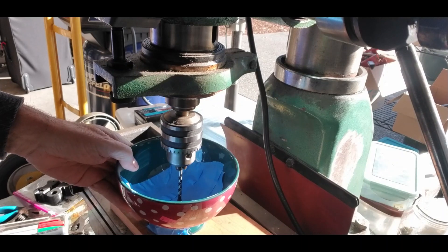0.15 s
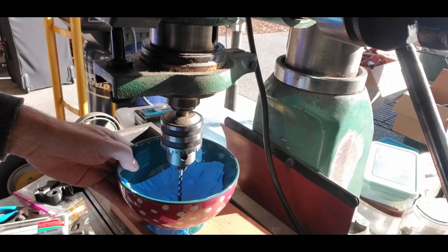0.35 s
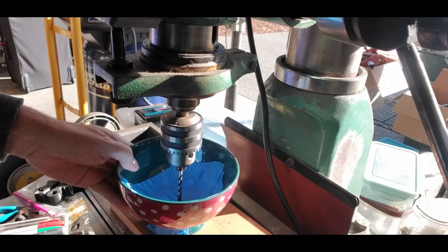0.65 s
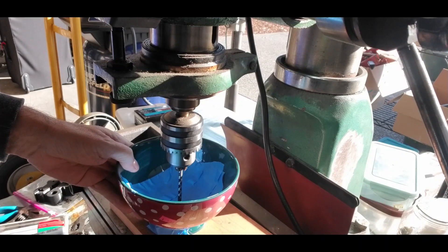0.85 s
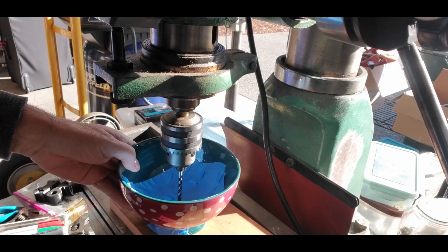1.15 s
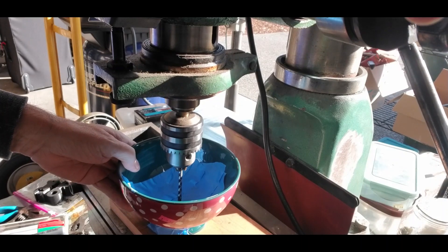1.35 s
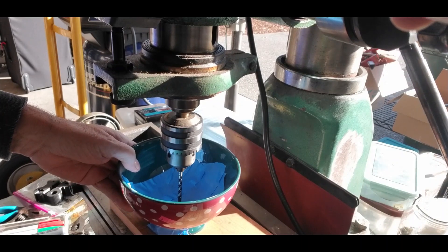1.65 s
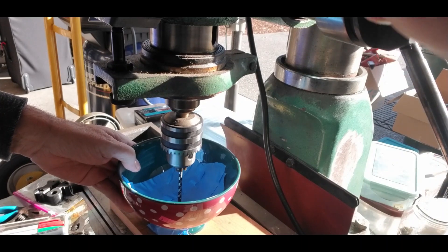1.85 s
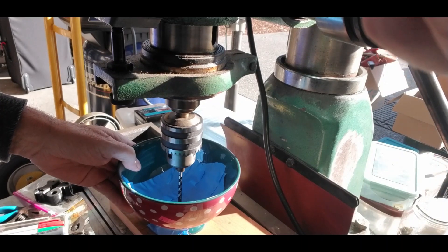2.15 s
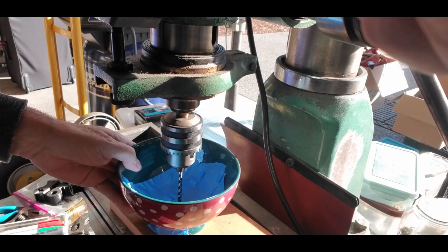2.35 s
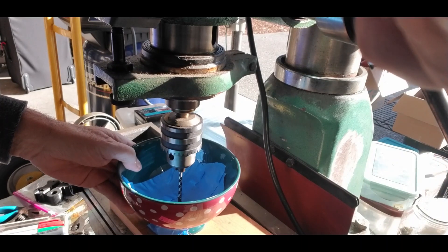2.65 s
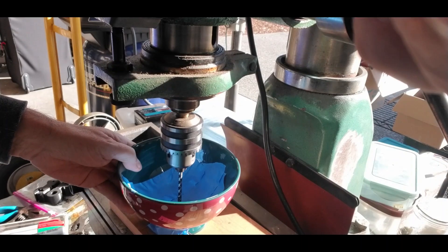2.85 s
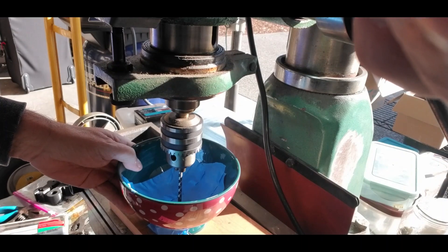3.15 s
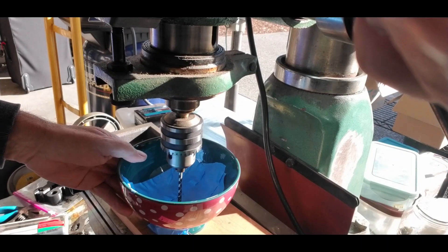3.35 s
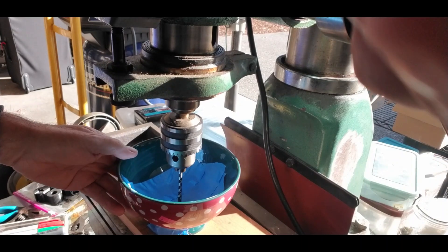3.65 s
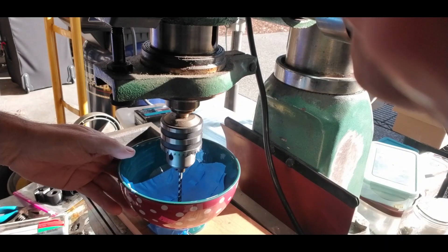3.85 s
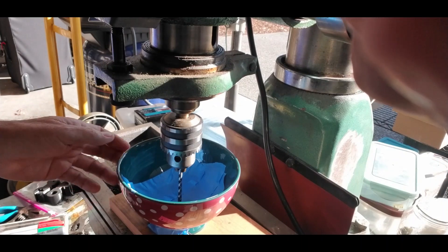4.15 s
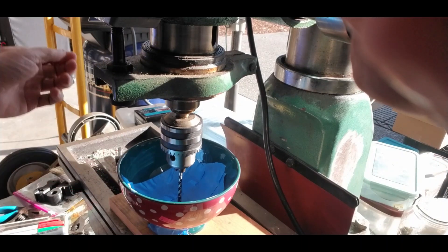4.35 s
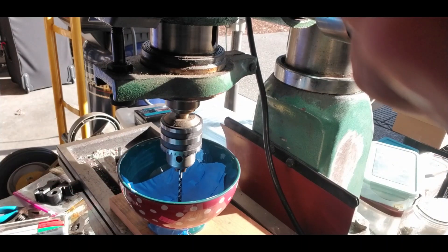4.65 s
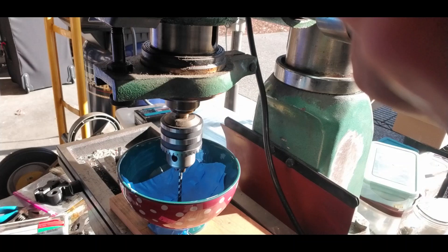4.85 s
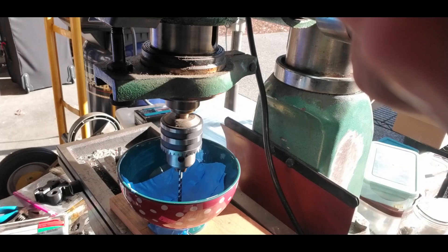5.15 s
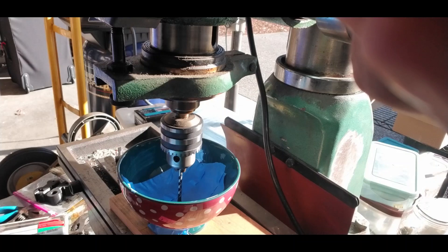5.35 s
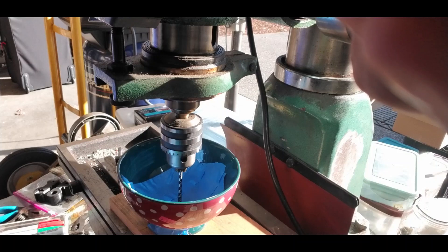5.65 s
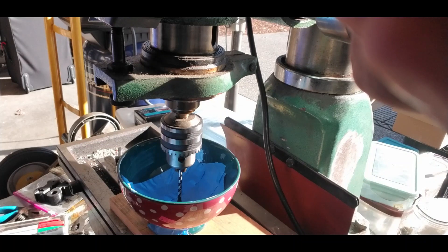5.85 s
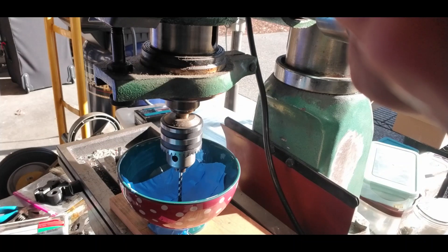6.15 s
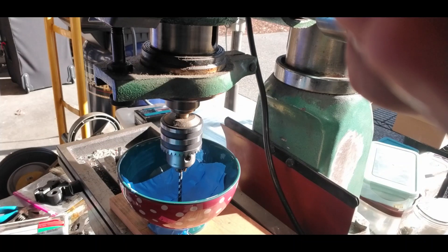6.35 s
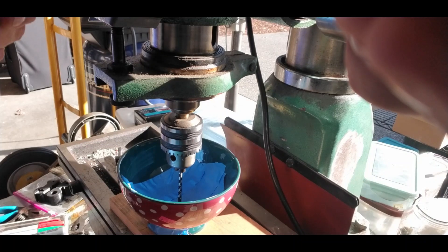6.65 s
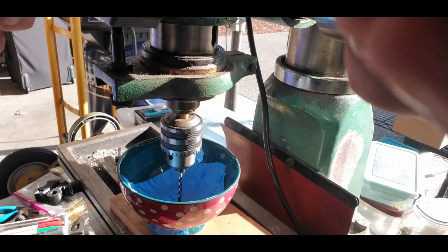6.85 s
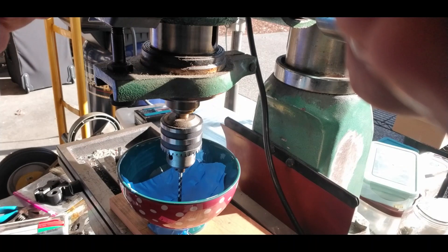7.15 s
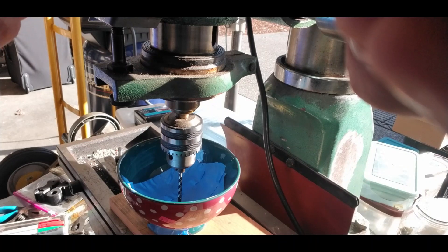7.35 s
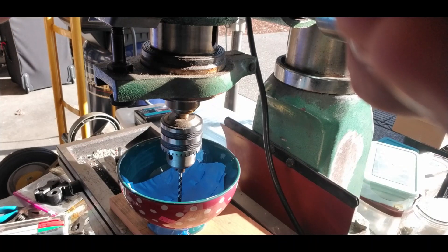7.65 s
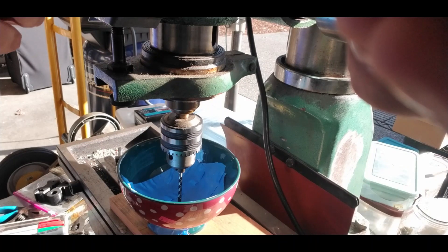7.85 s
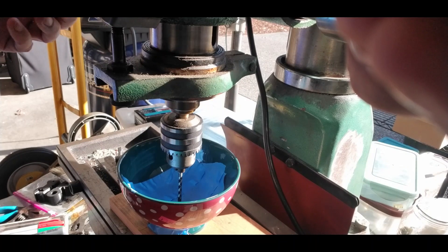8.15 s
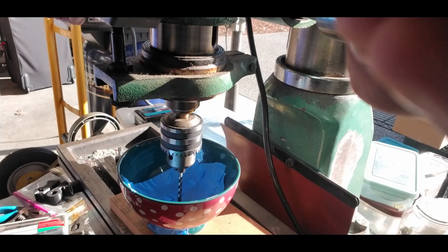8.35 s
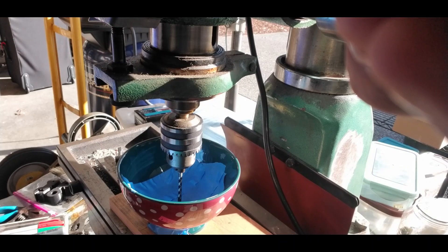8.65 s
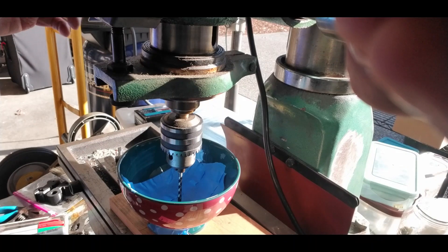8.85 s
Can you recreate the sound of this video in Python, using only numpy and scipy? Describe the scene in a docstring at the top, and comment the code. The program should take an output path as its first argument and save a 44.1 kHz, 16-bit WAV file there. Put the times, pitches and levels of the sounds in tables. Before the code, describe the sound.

A workshop machine motor hums steadily while its spinning bit scratches and chatters in a bowl, then snaps off, coasts down and rubs to a stop.

```python
"""A milling machine hums in a workshop while its spinning drill bit scratches and chatters in a hand-held bowl.
The hum is a set of mains harmonics and slot tones; filtered noise makes the rumble, hiss and scratching.
The power is cut and the switch snaps; the motor coasts until its centrifugal switch drops in and rubs it to a stop.
Light ticks and knocks, one a bouncing metal tink, are decaying noise and tones.
A low noise rumble lies underneath and swells near the end."""
import sys
import numpy as np
from scipy import signal
from scipy.fft import rfft, irfft, next_fast_len
from scipy.io import wavfile
from scipy.ndimage import uniform_filter1d, map_coordinates

SR = 44100
rng = np.random.default_rng(int(sys.argv[2]) if len(sys.argv) > 2 else 0)


def unload_audio(sound):
    """Save the sound as a 16-bit wav file, at the path given as the first command line argument."""
    columns = np.transpose(np.atleast_2d(sound))
    # keep every value between -1 and 1, then stretch to whole-number steps
    steps = np.round(np.clip(columns, -1, 1) * 32767)
    wavfile.write(sys.argv[1], SR, steps.astype(np.int16))


N = 397341

MAINS_HZ = 60
POWER_OFF_S = 5.72
FIRM_DB = -27  # the bit skips in a contact lighter than this

# How fast the shaft turns: (time [s], share of full speed)
SPEED = [(0, 1), (5.705, 1), (5.77, .955), (5.85, .905), (6.42, .55), (6.95, 0)]
# How hard the motor hums under its load: (time [s], level [dB])
LOAD = [(0, -26.5), (2.1, -26), (2.5, -27), (3.9, -27.5), (5.7, -27.5)]
# Single catches of the bit on the bowl, from faint to hard: (time [s], strength [dB])
CATCHES = [(2.0048, -29), (2.0936, -25.5), (2.1146, -22), (2.2916, -16), (2.382, -23), (2.4546, -26),
           (2.5257, -23), (2.617, -29), (2.7137, -27), (2.7247, -21), (2.8307, -29), (2.925, -25.5),
           (3.1522, -19), (3.166, -24), (3.1993, -20), (3.2224, -30), (3.26, -22), (3.3204, -26.5),
           (3.426, -26.5), (3.4411, -19), (3.5048, -30), (3.5788, -28), (3.7678, -25.5), (3.8117, -21.5),
           (3.928, -25), (3.9454, -27), (3.9918, -18.5), (4.021, -27.5), (4.3208, -24), (4.4368, -21.5),
           (4.471, -21), (4.5466, -21), (4.8334, -26), (4.884, -21.5), (4.9033, -19.5), (4.9666, -17.5),
           (5.0325, -28.5), (5.1277, -24.5), (5.3437, -20), (5.3522, -19.5), (5.4, -24.5), (5.4352, -38),
           (5.4645, -20.5), (5.473, -20), (5.4914, -25.5), (5.5044, -29), (5.5318, -16.5), (5.5375, -15.5),
           (5.6037, -27), (5.6111, -20.5), (5.646, -19), (5.6604, -30), (5.8366, -22.5), (5.8625, -25),
           (5.886, -29), (5.898, -36.5), (5.9125, -28.5), (5.9296, -27), (5.9364, -31.5), (5.9559, -26),
           (5.9728, -26), (5.9884, -32.5), (6.0033, -25.5), (6.0114, -27), (6.0899, -26), (6.0926, -21.5),
           (6.114, -23), (6.1409, -26), (6.1629, -22.5), (6.1714, -27.5), (6.1904, -29), (6.1994, -29.5),
           (6.2218, -21.5), (6.2304, -19), (6.2976, -27.5), (6.3126, -22), (6.324, -24.5), (6.3314, -23),
           (6.365, -29.5), (6.3894, -26), (6.4004, -28.5)]
# Resonances of the machine frame: (frequency [Hz], half-width [Hz], relative level [dB])
CASTING = [(143, 16, -5), (276, 10, 3), (336, 12, 3)]


def amp(db):
    """Turn decibels into gain."""
    return 10 ** (np.asarray(db) / 20)


def unit(x):
    """Scale to an rms of 1."""
    return x / np.sqrt(np.mean(x ** 2) + 1e-20)


def clock():
    """The time of every sample in seconds."""
    return np.arange(N) / SR


def along(points, hz):
    """Read a curve of (Hz, value) points on a log frequency axis."""
    f, v = np.transpose(points)
    return np.interp(np.log(hz + 1), np.log(f + 1), v)


def curves(rows):
    """One value per sample for each column after the time."""
    s, *columns = np.transpose(rows)
    return [np.interp(clock(), s, column) for column in columns]


def wobble(rate):
    """A smooth random curve with rate knots a second."""
    knots = rng.standard_normal(int(N * rate / SR) + 4)
    steps = np.arange(0, len(knots) - 1, 1 / 10)
    return np.interp(clock() * rate, steps, map_coordinates(knots, [steps]))


def ramp(start, length):
    """Rise from 0 to 1 over length seconds."""
    return np.clip((clock() - start) / length, 0, 1)


def swells(rows):
    """Bell-shaped gains from (centre s, half length s, dB) rows."""
    return sum(amp(db) * np.exp(-((clock() - s) / half) ** 2) for s, half, db in rows)


def pan(db):
    """Left and right gains for a level difference."""
    return amp([[db / 2], [-db / 2]])


def filtered(x, response):
    """Multiply the spectrum of x by a response of frequency."""
    m = next_fast_len(N + 8192)
    return irfft(rfft(x, m) * response(np.fft.rfftfreq(m, 1 / SR)), m)[..., :N]


def noise(spectrum, ripple_db=0):
    """Coloured stereo noise of rms 1; the ripple stands for a crowd of small metal resonances."""
    # How alike left and right are: (frequency [Hz], likeness)
    alike = [(30, 0.53), (100, 1), (330, 0.62), (600, 0.37), (1100, 0.33), (2000, 0), (12000, 0.19)]

    def colour(hz):
        turn = np.arccos(np.clip(along(alike, hz), -1, 1)) / 2
        ripple = map_coordinates(rng.standard_normal(400), [hz / 70])
        ripple = ripple * np.clip(hz / 2000 - .5, 0, 1)  # leaves the bass smooth
        return amp(along(spectrum, hz) + ripple_db * ripple) * [np.cos(turn), np.sin(turn)]

    mid, side = filtered(rng.standard_normal((2, N)), colour)
    return unit(np.array([mid + side, mid - side]))


def resonant(peaks, channels=1):
    """Noise of rms 1 shaped by (Hz, half-width Hz, dB) resonances."""
    def gain(hz):
        return sum(amp(db) / (1 + ((hz - centre) / width) ** 2) for centre, width, db in peaks)

    return unit(filtered(rng.standard_normal((channels, N)), gain))


def decay(t, t60, attack):
    """The envelope of a blow at t = 0: a quick rise, then a fall of 60 dB in t60 seconds."""
    t = np.maximum(t, 0)
    return np.exp(-np.log(1000) * t / t60) * (1 - np.exp(-t / attack))


def ring(modes, t, attack):
    """Add up damped (Hz, dB, t60 s) tones, at new strengths for each blow."""
    return sum(amp(db + 2 * rng.standard_normal()) * decay(t, t60, attack) * np.sin(2 * np.pi * hz * t)
               for hz, db, t60 in modes)


def crackle(rate, t60):
    """An envelope of rms 1 made of tiny random contacts, rate a second."""
    specks = (rng.random(N) < rate / SR) * rng.uniform(.3, 1, N)
    return unit(signal.fftconvolve(specks, decay(np.arange(SR // 8) / SR, t60, .0003))[:N])


def hum():
    """The field shakes the stator at twice the mains frequency; passing rotor slots add a whine with sidebands."""
    # Magnetic hum: (multiple of twice the mains frequency, relative level [dB], left-right difference [dB])
    harmonics = [(1, -30.5, 1.6), (2, -35, 1.1), (3, -32.5, -0.6), (4, -59.5, -16.5), (5, -58, 6),
                 (7, -59.5, 21), (8, -60, 7)]
    # Rotor slot whine: (sideband number, relative level [dB], left-right difference [dB], left lead [rad])
    sidebands = [(-1, -57, 35, 2.5), (0, -41.5, 7, 0), (1, -43, -2, 2), (2, -53.5, -6, 2),
                 (3, -40.5, -2.5, 1.34)]
    slot_hz = 1015.6  # at full speed
    field_fade_s, slot_fade_s = .036, .075  # time constants: the field collapses, the slot tone glides on
    [speed], [load_db] = curves(SPEED), curves(LOAD)
    field = 2 * np.pi * 2 * MAINS_HZ * clock()
    slots = 2 * np.pi * slot_hz * np.cumsum(speed) / SR + 0.38 * wobble(3.4)
    since_off = np.maximum(clock() - POWER_OFF_S, 0)
    powered = np.exp(-since_off / field_fade_s)
    gliding = np.exp(-since_off / slot_fade_s)

    drone = 0
    for k, db, lr in harmonics:
        # the frame delays each harmonic differently, which rounds off the pulses
        tone = np.cos(round(k) * field + 1.05 * k * k)
        drone = drone - pan(lr) * amp(db + .5 * wobble(14)) * tone

    whine = 0
    for k, db, lr, lead in sidebands:
        tone = np.cos(slots + round(k) * field + np.array([[lead], [0]]))
        fade = powered if round(k) else gliding
        whine = whine + pan(lr) * amp(db + 0.67 * wobble(25)) * fade * tone
    return amp(load_db - np.median(load_db)) * drone * powered + whine


def drive():
    """Frame rumble, bearing hiss that buzzes with the field, gear tones, and the belt joint chirping once a lap."""
    # Unsteady tones of the driven gear: (frequency [Hz], relative level [dB])
    gear_tones = [(71.3, -51), (986, -59), (1482, -63), (1798, -67), (1911, -68), (2153, -71), (2272, -69)]
    # Noise colours of frame, bearings and belt: (frequency [Hz], relative level [dB per Hz])
    frame_colour = [(25, -16.5), (55, -4), (85, -10), (140, -3.5), (195, -4.5), (300, 1.5), (370, -1),
                    (480, -14), (750, -7), (1000, -5.5), (1200, -12.5), (1500, -14), (2200, -53.5)]
    bearing_colour = [(900, -5.5), (1500, 2.5), (2100, 0.5), (2800, -6), (3500, -1), (4900, -12.5),
                      (7600, -13.5), (9200, -13.5), (13000, -9.5), (15800, -9.5)]
    belt_colour = [(1000, -57.5), (10000, -31), (12300, 4.5), (13300, 0.5), (14500, -2), (16000, -11)]
    frame_db, casting_db, hiss_db = -38, -44, -44  # average levels under power
    coast_frame_db, coast_hiss_db = -17, -8.5  # how far they change once the power is cut
    coast_lag_s, coast_fade_s = 0.042, 0.3
    hiss_per_load = 0.27  # dB of hiss for each dB of hum
    [speed], [load_db] = curves(SPEED), curves(LOAD)
    travel = np.cumsum(speed) / SR
    torque = np.exp(-np.maximum(clock() - POWER_OFF_S, 0) / .06)
    turning = np.clip(speed / .5, 0, 1) ** 3
    coasting = ramp(POWER_OFF_S + coast_lag_s, coast_fade_s)

    tones = sum(amp(db + 2.5 + 4.4 * wobble(12)) * np.cos(2 * np.pi * hz * travel + 0.5 * wobble(10))
                for hz, db in gear_tones)
    frame = amp(frame_db + 1.8 * wobble(20)) * noise(frame_colour) + amp(casting_db) * resonant(CASTING)
    frame = frame * amp(coast_frame_db * coasting + 0.49 * wobble(2.7))

    buzz = 1 + 0.069 * torque * np.cos(2 * np.pi * 2 * MAINS_HZ * clock())
    hiss_level = hiss_db + hiss_per_load * (load_db - np.median(load_db))
    hiss_level = hiss_level + coast_hiss_db * coasting + 1.77 * wobble(18)
    hiss = amp(hiss_level) * buzz * noise(bearing_colour, ripple_db=3.2)

    lap = (travel - .142) % .2803  # seconds into each lap at full speed
    chirp = decay(lap, 0.0736, 0.0018) + 0.39 * decay(lap - .075, 0.17, 0.0068)
    belt = amp(-35) * chirp * speed ** 2 * noise(belt_colour)
    return tones * torque + (frame + hiss) * turning + belt


def ambience():
    """Filtered noise: a low rumble that swells and booms over a deep floor, soft air and faint rustles."""
    # Rise and fall of the low rumble: (time [s], relative level [dB])
    rumble_swell = [(6.6, -50.5), (7.1, -55), (7.13, -48), (7.63, -56.5), (7.87, -46), (8.7, -51.5),
                    (8.73, -43), (9.01, -38.5)]
    # Low resonant swells: (centre [s], half length [s], level [dB])
    booms = [(8.16, 0.11, -41.5), (8.42, 0.059, -39.5), (8.68, 0.12, -43.5), (8.91, 0.052, -44.5)]
    # Faint rustles: (centre [s], half length [s], average level [dB])
    rustle_swells = [(8.55, 0.065, -71), (8.77, 0.0602, -65.5), (8.97, 0.058, -63.5)]
    # Noise colours: (frequency [Hz], relative level [dB per Hz])
    rumble_colour = [(22, -21.5), (45, -6), (90, 4), (145, 4.5), (175, -2.5), (215, -5), (260, -9),
                     (400, -14), (600, -58)]
    deep_colour = [(20, -4.5), (50, 11), (90, -10.5), (200, -57.5)]
    air_colour = [(160, -41.5), (280, -10), (595, -10.5), (654, -14), (880, -15.5), (1340, -25),
                  (1700, -23.5), (1920, -32), (7000, -60), (9100, -87.5), (15400, -120)]
    rustle_colour = [(1000, -15.5), (2500, -1.5), (5000, -6.5), (9000, -9.5), (12500, 8), (16000, 2)]
    # The air grows louder between these two times: (start [s], end [s])
    rise_from, rise_to = (7.76, 9.74)
    air_db, air_rise_db, rustle_floor_db = -54.5, 11, -78
    [rumble_db] = curves(rumble_swell)
    rumble = amp(rumble_db + 3.0 + wobble(22)) * noise(rumble_colour)
    rumble = rumble + swells(booms) * resonant([(203, 18, 0)])
    air_level = air_db + air_rise_db * ramp(rise_from, rise_to - rise_from) + 0.8 * wobble(4.9)
    room_tone = amp(-60) * noise(deep_colour) + amp(air_level) * noise(air_colour)
    rustle_gain = amp(rustle_floor_db) + swells(rustle_swells) * amp(2.8 * wobble(40))
    return pan(0.93) * (rumble + room_tone) + rustle_gain * noise(rustle_colour)


def handling():
    """Light knocks and ticks are bursts of noise; a bouncing tink of steel adds damped tones."""
    # Light knocks on the machine, then sharp ticks: (time [s], relative level [dB], t60 [s])
    knocks = [(2.291, -31.5, .035), (7.16, -46.5, 0.15), (7.947, -54.5, 0.19), (8.556, -36, 0.15),
              (8.62, -39, .21)]
    ticks = [(.477, -34.5, 0.035), (.522, -30.5, 0.086), (1.364, -37, 0.13), (2.548, -21, 0.015),
             (7.159, -43.5, 0.02), (8.514, -54, 0.028), (8.556, -44, 0.031), (8.619, -53, .035)]
    # Steel touches and bounces: (time [s], relative level [dB])
    tinks = [(7.159, -41), (7.168, -44.5)]
    # Noise colours of knock and tick: (frequency [Hz], relative level [dB per Hz])
    knock_colour = [(240, -49), (400, -9.5), (502, -19.5), (907, -3.5), (1500, -14), (2060, -21),
                    (2700, -19), (4200, -27.5), (15000, -51)]
    tick_colour = [(1200, -23.5), (2800, 3), (5000, -0.5), (9000, -0.5), (15000, -2.5)]
    # What the knocks ring, then the tink's metallic clash: (frequency [Hz], half-width [Hz], relative level [dB])
    knock_body = [(830, 61, 0), (1160, 42, -19), (1740, 34, 4), (2370, 77, -4), (2850, 90, -15),
                  (3420, 38, -25.5), (5250, 46, -23)]
    jangle_peaks = [(1980, 130, -2), (3050, 230, -2.5), (3600, 250, -5), (5140, 360, -5.5), (9050, 350, -9),
                    (13500, 900, -11)]
    # Tones of the steel: (frequency [Hz], relative level [dB], t60 [s])
    steel_modes = [(1981, -11, .08), (3020, -4, .04), (3542, -1, .07), (3590, -10, .04), (5566, -12, .06),
                   (8950, -19, .03), (12190, -15, .07)]
    t = clock()

    def blows(rows):
        return sum(amp(db) * decay(t - s, t60, 0.00019) for s, db, t60 in rows)

    body = amp(-1.5) * noise(knock_colour, ripple_db=2.5) + amp(-10) * resonant(knock_body, channels=2)
    tones = sum(amp(db) * ring(steel_modes, np.maximum(t - s, 0), attack=0.00043) for s, db in tinks)
    jangle = blows([(s, db + 1.5, .03) for s, db in tinks]) * resonant(jangle_peaks, channels=2)
    return blows(knocks) * body + blows(ticks) * noise(tick_colour) + amp(2.0) * tones + jangle


def chatter(count=32):
    """(s, dB) of the skids in every contact: uneven, and closer together the firmer the bowl leans."""
    # The bowl leans on the bit: (start [s], length [s], middle strength [dB])
    contacts = [(2.302, .17, -31), (2.631, .18, -33), (2.864, .24, -30), (3.109, .075, -27),
                (3.235, .19, -32.5), (3.593, .05, -31), (3.768, .1, -27), (3.992, .03, -27),
                (4.274, .14, -34.5), (4.465, .055, -29), (4.548, .04, -27.5), (4.62, .035, -29),
                (4.833, .03, -26.5), (4.908, .17, -32.5), (5.275, .065, -26.5), (5.702, .045, -26)]
    gap_s, gap_spread, scatter_db = .0095, .35, 3  # middle gap when firm, its log spread, scatter of strength
    skip_per_db = .11  # how fast the gaps grow in lighter contacts
    clear_s = .007  # chatter skids this close to a single catch are left out
    draws = rng.standard_normal((len(contacts), 2, count))
    skids = []
    for (start, length, db), (timing, force) in zip(contacts, draws):
        gaps = gap_s * np.exp(gap_spread * timing + skip_per_db * max(FIRM_DB - db, 0))
        times = np.cumsum(gaps) - gaps
        skids += [(start + s, db + scatter_db * np.tanh(f)) for s, f in zip(times, force) if s < length]
    return [(s, db) for s, db in skids if all(abs(s - catch) > clear_s for catch, _ in CATCHES)]


def bit():
    """Each catch or chatter is a short skid of the bit that rings the bowl; finer scratches cluster around the skids."""
    # Noise colours of scrape and scuff: (frequency [Hz], relative level [dB per Hz])
    grit_colour = [(300, -29.5), (900, -2), (1700, 0), (2400, -18.5), (3300, -4), (4600, -14.5),
                   (6600, -18.5), (7300, -5.5), (8400, -1.5), (12500, -1.5), (14300, -9.5), (15600, 1)]
    scuff_colour = [(500, -10.5), (1000, 0.5), (1800, -2.5), (3500, -7.5), (7000, -8), (15000, -23.5)]
    # Drill bit resonances: (frequency [Hz], half-width [Hz], relative level [dB])
    flute_peaks = [(3230, 250, -9), (7434, 290, 0.5), (9350, 130, 0), (9780, 70, -0.5), (10960, 240, 7.5),
                   (12000, 170, -4), (13280, 190, 3.5)]
    # Tones of the bowl: (frequency [Hz], relative level [dB], t60 [s])
    bowl_modes = [(555, -4, .045), (660, 0, .055), (760, -1.5, .04), (880, -8, .03)]
    # Dull scuffs, then pushes that make the bowl growl: (centre [s], half length [s], relative level [dB])
    scuff_swells = [(3.606, .012, -42.5), (3.882, 0.0081, -38.5), (4.476, 0.015, -39.5),
                    (4.552, .01, -45.5), (5.283, 0.0062, -32.5), (6.259, 0.01, -47)]
    pushes = [(2.31, .03, -45), (3.15, .04, -39), (3.815, .04, -42), (4.89, 0.043, -39), (5.54, 0.014, -34)]
    skid_s, skid_rise_s, skid_t60_s = .0014, .0006, .012  # hold at full speed, attack, release
    ring_db, ring_t60_s = -8, .035  # the bit rings on after a skid
    steel_db, bowl_db, bowl_slow_db = -5.5, -9.5, 19.5  # a slower bit shoves the bowl harder
    bowl_follow = .55  # dB of bowl ring per dB of skid: the sharpest skids are glancing ones
    bowl_detune = .04  # the bowl's pitch shifts with the point of contact
    graze_db, graze_follow_db, graze_s = -51, -7, 0.089  # fine scratches: floor, level against skids, spread
    t = np.arange(SR // 8) / SR
    [speed] = curves(SPEED)

    slips = unit(amp(2.4 * wobble(1100)))  # the edge sticks and slips within a skid
    scrape, flutes = amp(1.5 * np.array([wobble(70), wobble(70)]))  # the colour changes from skid to skid
    steel = amp(-2.5) * scrape * noise(grit_colour, ripple_db=2)
    steel = steel + amp(-3.5) * flutes * resonant(flute_peaks, channels=2)
    scuffs = swells(scuff_swells) * noise(scuff_colour)
    bowl_peaks = [(hz, 2 / t60, db) for hz, db, t60 in bowl_modes]
    growl = swells(pushes) * crackle(110, .02) * resonant(bowl_peaks)[0]

    skids, bowl = np.zeros(N + SR), np.zeros(N + SR)
    for s, db in list(CATCHES) + chatter():
        start = round(s * SR)
        span = slice(start, start + len(t))
        hold = skid_s / speed[start] ** 2  # longer as the bit slows
        release = np.exp(-np.log(1000) * np.maximum(t - hold, 0) / skid_t60_s)
        skid = np.minimum(t / skid_rise_s, 1) * release
        skids[span] += amp(db) * (skid + amp(ring_db) * decay(t, ring_t60_s, hold))
        pitch = 1 + bowl_detune * rng.standard_normal()
        level = FIRM_DB + bowl_follow * (db - FIRM_DB) + bowl_db + bowl_slow_db * (1 - speed[start])
        bowl[span] += amp(level) * ring(bowl_modes, t * pitch, attack=hold / 2)
    skids, bowl = skids[:N], bowl[:N]

    touching = (clock() > 1.98) & (clock() < 6.42)
    pressure = np.sqrt(np.abs(uniform_filter1d(skids ** 2, round(graze_s * SR))))
    graze = (amp(graze_db) + amp(graze_follow_db) * pressure) * crackle(85, 0.02) * touching * speed ** 4
    scratches = amp(steel_db) * np.hypot(skids, graze) * slips * steel
    return pan(-3.0) * scratches + pan(4.3) * (bowl + growl) + scuffs


def run_down():
    """As the shaft slows, its harmonics glide down through the frame's resonances and swell in turn."""
    # Shaft harmonics that shake the frame: (multiple of the turning rate, relative level [dB])
    shaft_orders = [(6, -4), (11, -4), (12, 0), (15, 3)]
    shaft_hz = 29.8  # turns a second at full speed
    [speed] = curves(SPEED)
    turns = shaft_hz * np.cumsum(speed) / SR

    def gain(hz):
        # resonances half as wide again as in the table
        return sum(amp(db) / (1 + ((hz - centre) / (1.5 * width)) ** 2) for centre, width, db in CASTING)

    orders = sum(amp(db) * gain(k * shaft_hz * speed) * np.sin(2 * np.pi * (k * turns + rng.random()))
                 for k, db in shaft_orders)
    fade = decay(clock() - POWER_OFF_S, 2.1, 0.051) * np.clip(speed / .5, 0, 1) ** 3
    return amp(-40) * fade * orders


def switches():
    """The power switch snaps, then the centrifugal switch clashes shut and its collar rubs and squeaks to a stop."""
    # Noise colours of power switch and collar: (frequency [Hz], relative level [dB per Hz])
    snap_colour = [(290, -36), (500, -8), (1610, -17.5), (1890, 3), (2350, -13.5), (2710, 3.5), (3420, -20),
                   (3730, -4), (4240, -11.5), (5350, -1), (8490, -2.5), (15800, -3)]
    collar_colour = [(150, -57.5), (250, -29), (366, -1), (492, -19), (660, 0), (1020, -16.5), (1200, -11),
                     (1600, -14.5), (2000, -19.5), (2430, -16.5), (3260, -11), (5000, -8.5), (8100, -8.5),
                     (8800, -14), (12200, -13), (15800, -16.5)]
    # What switch box and motor housing ring with: (frequency [Hz], half-width [Hz], relative level [dB])
    box_peaks = [(1890, 50, -6.5), (2730, 60, -0.5), (3730, 50, -2), (5380, 70, -3.5)]
    housing_peaks = [(657, 51, -5), (1250, 90, -16), (1600, 60, -10), (1880, 35, -14), (2350, 22, -9),
                     (2480, 30, -10), (2740, 90, -9), (3160, 35, -6), (3320, 50, -5), (3790, 45, -7),
                     (4130, 25, -7), (4350, 28, -5), (4705, 25, -4), (4842, 30, 2), (4990, 30, -5),
                     (5740, 35, -4), (7410, 40, -5), (8170, 50, -6)]
    # Gliding squeak: (time [s], middle pitch [Hz], relative level [dB])
    squeak_glide = [(6.5, 8760, -62), (6.56, 8000, -46), (6.6, 7050, -49.5), (6.65, 6000, -51),
                    (6.74, 5150, -65), (6.8, 4800, -83)]
    # The collar grabs: (time [s], relative level [dB], t60 [s])
    grab_blows = [(6.675, -41.5, 0.084), (6.905, -66.5, .15)]
    rub_start_s, rub_stop_s, stop_fade_s = 6.465, 6.9, 0.03
    rub_db, rub_db_per_s = -43, -45.5  # level at the start of the rub, and its slope
    t = clock()
    squeak_hz, squeak_db = curves(squeak_glide)

    since_snap = t - 5.7648
    snap = amp(-10) * decay(since_snap, 0.035, 0.00059) + amp(-32) * decay(since_snap, 0.33, 0.0042)
    snap = snap * noise(snap_colour, ripple_db=2)
    box = amp(-33.5) * decay(since_snap, .2, .001) * resonant(box_peaks, channels=2)
    # the frame rings on as the torque drops
    shudder = amp(-40) * decay(since_snap, 1.6, .01) * resonant([(277, 7, -3), (326, 9, -3), (118, 8, 0)])

    slide = amp(-27.5) * np.exp(-np.abs(t - 6.424) / 0.0056)  # the weights slide inwards
    rattle = crackle(650, .007)  # and rattle as they land
    clash = amp(-17.5) * decay(t - 6.4235, 0.22, 0.005) * (1 + rattle) / 2
    metal = amp(-1.1) * noise(collar_colour, ripple_db=3.5) + amp(-1.0) * resonant(housing_peaks, channels=2)

    rubbing = ramp(rub_start_s, .05) * np.exp(-np.maximum(t - rub_stop_s, 0) / stop_fade_s)
    grabs = sum(amp(db) * decay(t - s, t60, .004) for s, db, t60 in grab_blows)
    rub_level = rub_db + rub_db_per_s * np.maximum(t - rub_start_s, 0) + 2.7 * wobble(68)
    rub = (amp(rub_level) + grabs) * noise(collar_colour)
    stutter = amp(squeak_db - 5 + 6 * wobble(55))
    shaky_hz = squeak_hz * (1 + .05 * wobble(1200) + .05 * wobble(45))
    squeak = stutter * np.sin(2 * np.pi * np.cumsum(shaky_hz) / SR)
    return pan(-2.3) * snap + box + shudder + pan(-1.6) * (slide + clash) * metal + (rub + squeak) * rubbing


def workshop(x):
    """The room's answer: a noise tail in which each frequency dies at its own speed."""
    # Echo length of the room: (frequency [Hz], t60 [s])
    echo_t60 = [(200, 0.41), (2000, 0.31), (6000, 0.17), (14000, 0.096)]
    hz, t, z = signal.stft(rng.standard_normal((2, SR // 2)), SR, nperseg=256)
    fading = np.exp(-np.log(1000) * t / along(echo_t60, hz)[:, None])
    tail = signal.istft(z * fading, SR, nperseg=256)[1]
    late_tail = np.pad(tail, ((0, 0), (SR // 200, 0)))  # starts 5 ms late
    return signal.fftconvolve(x, late_tail / np.linalg.norm(tail[0]), axes=1)[:, :N]


def scene():
    """The running machine, its contacts in the room, and the background."""
    steady = np.sqrt(2) * hum() + drive() + run_down() + ambience()
    far = switches() + handling()
    near = bit()
    return steady + near + far + workshop(amp(-10.0) * near + amp(-9.0) * far)


def record(dry):
    """Cut off everything above the band limit."""
    top_hz = 15850
    return filtered(dry, lambda hz: hz < top_hz)


dry = scene()
out = record(dry)
unload_audio(out)
```